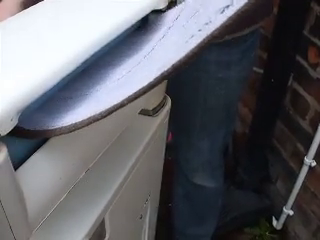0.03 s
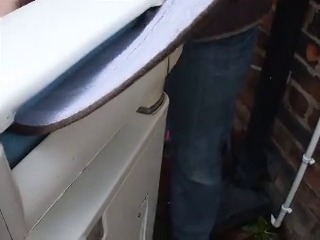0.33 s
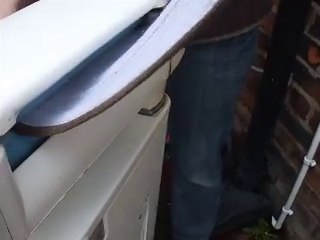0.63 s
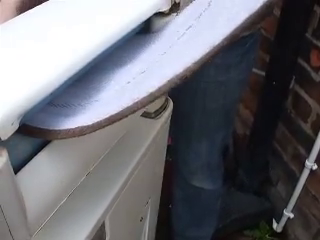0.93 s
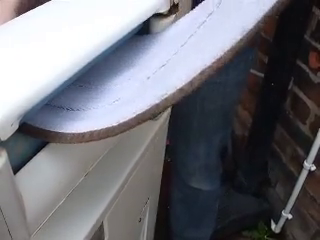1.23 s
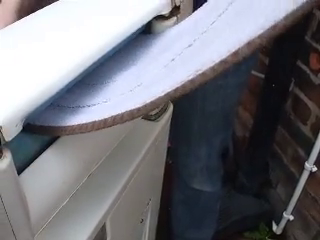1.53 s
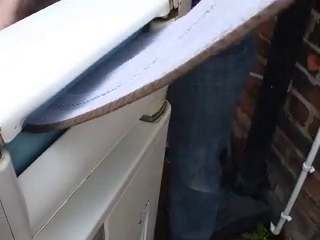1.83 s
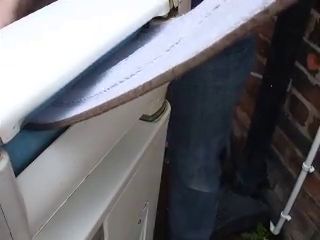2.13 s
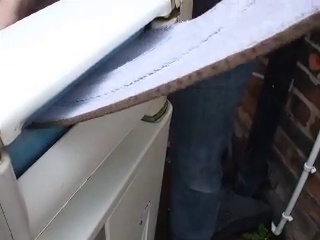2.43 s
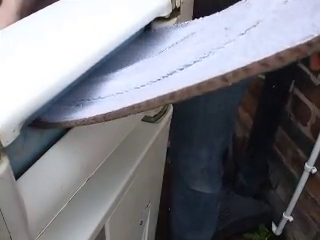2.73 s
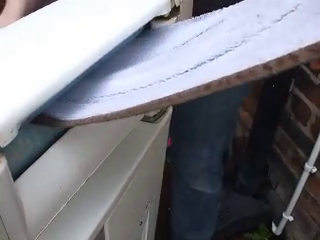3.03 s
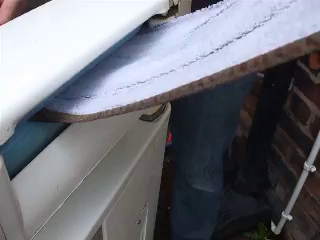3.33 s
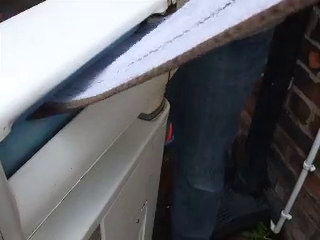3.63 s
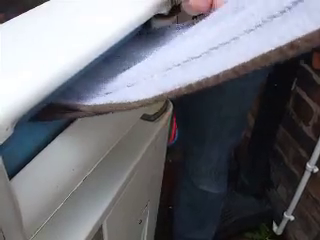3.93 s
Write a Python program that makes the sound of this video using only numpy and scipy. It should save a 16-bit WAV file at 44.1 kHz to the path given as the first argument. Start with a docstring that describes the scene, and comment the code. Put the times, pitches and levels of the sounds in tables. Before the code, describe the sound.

A washing machine wringer clunks sharply at about 0.7, 1.5, 2.4 and 3.3 seconds, each strike briefly ringing the metal frame and overloading the close microphone. A low motor hum runs throughout, with a few soft cabinet bumps. More quietly, water squelches and fizzes from a wet rug and gurgles into the tub, wettest near 3 seconds, then easing off while the motor hums on.

```python
"""A washing machine in a brick yard, one microphone close beside its wringer.
From the start the motor hums and the rollers draw a wet rug through: water squelches out and gurgles
into the tub. At 0.7 s, and again once a turn, the roller drive slips and clunks, ringing the steel
frame, shaking the cabinet and overloading the microphone. The wettest squeeze comes near 3 s,
just before the fourth clunk; then the water eases off and the motor hums on."""
import sys
import numpy as np
from scipy import signal
from scipy.fft import rfft, irfft, next_fast_len
from scipy.io import wavfile
from scipy.ndimage import map_coordinates

SR = 44100
rng = np.random.default_rng(int(sys.argv[2]) if len(sys.argv) > 2 else 0)


def to_wav(sig):
    """Store sig (one row per channel, or 1-D mono) as 16-bit WAV at the path in sys.argv[1].

    Samples outside -1..1 are clipped; the rate is SR.
    """
    pcm = np.clip(np.atleast_2d(sig), -1, 1) * 32767
    pcm = np.round(pcm).astype(np.int16)
    wavfile.write(sys.argv[1], SR, pcm.T)  # frames by channels


N = 176400

# slips of the drive, close to the microphone: t/s, level/dB, ring re that level/dB, cabinet thud/dB
DRIVE_SLIPS = [(0.6604, -1.7, -28, -30), (1.5374, -2, -27, -27), (2.4023, -1, -24, -30),
               (3.2773, -1.5, -28.5, -32)]
# colour of the strike: f/Hz, level/dB
STRIKE_COLOUR = [(100, -22), (450, -16), (800, -5), (1450, -3), (1750, -10), (2000, -2.5), (2400, 7.5),
                 (2700, -3), (3000, 0), (3400, -20.5), (3900, -6), (5500, -7)]
# modes of the wringer's steel frame: f/Hz, level/dB, t60/s
FRAME_MODES = [(727, -7, .22), (807, -8, .25), (1217, -6, .16), (1378, -9, .35), (1776, -16, .5),
               (2000, -1, .15), (2346, -10, .5), (2535, -8, .25), (2835, -6, .16), (3089, -3, .22),
               (4226, -12, .2), (4800, -11, .13), (5245, -14, .42), (5776, -16, .45)]
# colour of the loose parts: f/Hz, level/dB
RATTLE_COLOUR = [(150, -23.5), (500, 0), (900, 1.5), (1150, -1.5), (1700, -2.5), (2400, 1), (3200, -2.5),
                 (3800, -2), (4400, -7), (5600, -14.5)]
# colour of the cabinet: f/Hz, level/dB
CABINET_COLOUR = [(20, -2), (50, -4), (130, 0), (260, -3.5), (400, -12), (700, -19.5), (1500, -44.5),
                  (4000, -83.5)]


def drive_clunks():
    """A hard strike and its rebound ring the frame, rattle loose parts and thud the cabinet."""
    out, t = np.zeros(N), np.arange(SR * 3 // 4) / SR
    rebound_s, ring_rise_s, thud_rise_s = .0023, .00049, .021
    for s, db, ring_db, thud_db in DRIVE_SLIPS:
        strike = amp(db + 15) * click(STRIKE_COLOUR)
        ring = np.zeros(len(t))
        for hz, mode_db, t60 in FRAME_MODES:
            envelope = amp(mode_db + rng.normal(0, 1.2)) * fade(t, t60)
            ring += envelope * np.sin(2 * np.pi * (hz * t + rng.random()))
        rattle = noise(RATTLE_COLOUR, len(t)) * (fade(t, t60=.2) + amp(3) * fade(t, t60=.023))
        metal = (amp(ring_db) * ring + amp(-20.5) * rattle) * (1 - np.exp(-t / ring_rise_s))
        thud = noise(CABINET_COLOUR, len(t)) * (1 - np.exp(-t / thud_rise_s)) * fade(t, t60=.47)
        add(out, s, strike)
        add(out, s + rebound_s, amp(-11) * strike)
        add(out, s, amp(db) * metal + 2 * amp(thud_db) * thud)
    return out


# water pressed through the cloth at the rollers: t/s, relative level/dB
SQUEEZE_FLOW = [(0, -47.5), (.13, -41), (.41, -42), (.48, -52.5), (.58, -49), (.78, -45), (.98, -48),
                (1.1, -59.5), (1.26, -53), (1.42, -44.5), (1.62, -43.5), (1.85, -49), (2.0, -43.5),
                (2.25, -40.5), (2.38, -52), (2.55, -69), (2.6, -41), (2.96, -37.5), (3.2, -39.5),
                (3.38, -57), (4, -50)]
# colour of the fizz: f/Hz, level/dB
FIZZ_COLOUR = [(100, -42), (600, -18), (1200, -4), (2000, -3.5), (3000, 2.5), (4000, 2.5), (5500, -1.5)]
# larger bubbles bursting from the cloth: t/s, relative level/dB, f/Hz
CLOTH_BURSTS = [(.218, -24.5, 2230), (.300, -21.5, 5100), (.377, -29, 1630), (.412, -22, 4500),
                (.529, -21.5, 3170), (.547, -34, 2780), (.561, -26, 3600), (.607, -18, 4600),
                (.799, -26.5, 2840), (.845, -24.5, 3580), (.865, -24.5, 1950), (.867, -22.5, 3700),
                (.899, -27, 3080), (.963, -24.5, 4580), (.979, -21, 4350), (1.327, -31.5, 3260),
                (1.411, -29.5, 3000), (1.675, -16.5, 4380), (1.739, -30.5, 3700), (1.813, -21, 4520),
                (1.975, -21.5, 4070), (2.049, -27, 3600), (2.086, -20.5, 3480), (2.122, -22, 3930),
                (2.126, -25.5, 2140), (2.165, -23, 4300), (2.185, -27, 1520), (2.26, -24, 4300),
                (2.587, -25, 4450), (2.633, -24, 3640), (2.694, -12, 4000), (2.795, -22, 3500),
                (2.837, -22, 3400), (2.926, -21, 4800), (2.956, -16.5, 4840), (2.98, -24.5, 3260),
                (3.14, -28, 4240), (3.185, -27.5, 3400), (3.2525, -17, 4100), (3.712, -33.5, 3740),
                (3.738, -35, 3300)]


def rug_squelch():
    """Air and water leave the cloth as fizz, small bubbles and larger bursts."""
    fizz = amp(-4.5 + 2.5 * wobble(80)) * level(SQUEEZE_FLOW, clock()) * noise(FIZZ_COLOUR, N)
    tiny = stream(SQUEEZE_FLOW, centre_hz=4584, scatter=.22, spread_db=6, cycles=33, count=1900)
    medium = stream(SQUEEZE_FLOW, centre_hz=1910, scatter=.3, spread_db=3.5, cycles=25, count=700)
    large = bursts(CLOTH_BURSTS, spread_s=.011, scatter=.15, cycles=22, glide=.13,
                   fall_db=10.5, sink_octaves=.18, count=10)
    return fizz + amp(-3) * tiny + amp(-12) * medium + amp(.5) * large


# water running back into the tub: t/s, level/dB
RUNOFF_FLOW = [(0, -74), (.12, -47.5), (.33, -45), (.48, -52), (.8, -46.5), (1.05, -53.5), (2.55, -53.5),
               (2.66, -43.5), (2.74, -49.5), (2.88, -45), (3.18, -46.5), (3.4, -56), (4, -61.5)]
# drops landing in the tub: t/s, relative level/dB, f/Hz
TUB_DROPS = [(.094, -26, 625), (.111, -25, 730), (.136, -23, 650), (.275, -24, 615), (.375, -26, 670),
             (1.670, -23.5, 880), (1.739, -33, 720), (2.884, -23.5, 750), (3.695, -22.5, 814)]


def tub_runoff():
    """Water gurgles and plops into the tub as low, quickly damped bubbles."""
    gurgle = stream(RUNOFF_FLOW, centre_hz=791, scatter=.21, spread_db=2, cycles=7.8, count=1100)
    plops = bursts(TUB_DROPS, spread_s=.011, scatter=.17, cycles=13, glide=.12,
                   fall_db=9, sink_octaves=0, count=4)
    return gurgle + amp(1) * plops


# dull bumps of the cabinet: t/s, level/dB, Gaussian width/s
CABINET_BUMPS = [(0.74, -32.5, 0.051), (1.332, -43, .025), (1.528, -31, 0.02), (1.639, -22, 0.011),
                 (1.672, -23, 0.0062), (1.796, -32, .04), (2.117, -43.5, 0.035), (3.61, -25.5, 0.014),
                 (3.646, -28, 0.012), (3.713, -31, 0.026)]


def cabinet_bumps():
    """The cabinet booms softly as the rug drags on it."""
    swell = sum(amp(db) * np.exp(-.5 * ((clock() - s) / width) ** 2) for s, db, width in CABINET_BUMPS)
    return swell * noise(CABINET_COLOUR, N)


# hum of the motor iron: harmonic number, rms level/dB, waver/dB
IRON_HUM = [(1, -33.5, 0.7), (2, -30.5, .7), (3, -39, 1.5), (5, -56.5, 0.85), (6, -58, 1.7), (7, -53, 1.7)]
# tones of the turning parts: f/Hz, rms level/dB
TURNING_TONES = [(146, -53.5), (239, -54), (297.8, -49.5), (348, -53.5)]
# colour of the machine's rumble: f/Hz, level/dB
RUMBLE_COLOUR = [(20, -5), (40, -0.5), (90, 0), (170, -5), (330, -5), (450, -10.5), (900, -39),
                 (3000, -82.5)]
# colour of its running noise: f/Hz, level/dB
RUNNING_COLOUR = [(200, -7.5), (400, -4), (680, -1.5), (1000, -5), (1400, -10), (2500, -16), (4000, -18),
                  (5600, -22)]


def motor(hum_hz=100):
    """Behind the wringer's sounds, mains hum beats with the turning parts over running noise."""
    t, tones = clock(), np.zeros(N)
    for k, db, waver_db in IRON_HUM:
        gain = amp(db + waver_db * wobble(7))
        tones += gain * np.cos(2 * np.pi * k * hum_hz * t + .018 * k * wobble(5))
    for hz, db in TURNING_TONES:
        tones += amp(db + 1.8 * wobble(7.7)) * np.sin(2 * np.pi * hz * t + 1.4 * wobble(4))
    rumble = amp(-41.5 + .86 * wobble(9.8)) * noise(RUMBLE_COLOUR, N)
    running = amp(-45 + 1.1 * wobble(13)) * noise(RUNNING_COLOUR, N)
    return np.sqrt(2) * tones + rumble + running


# decay between the brick walls around the machine: f/Hz, t60/s
WALL_DECAY = [(100, 0.6), (1000, 0.14), (3000, 0.12), (6000, 0.072)]


def yard_echo(x):
    """A short answer from the walls, the treble dying first."""
    hz, t, spectra = signal.stft(rng.standard_normal(SR // 3), SR, nperseg=256)
    _, tail = signal.istft(spectra * fade(t, along(WALL_DECAY, hz)[:, None]), SR, nperseg=256)
    return signal.fftconvolve(x, tail / np.linalg.norm(tail))[:N]


def bursts(rows, spread_s, scatter, cycles, glide, fall_db, sink_octaves, count):
    """Each (t/s, level/dB, f/Hz) row is a quick cluster of bubbles that weaken and may sink in pitch."""
    s, db, hz = np.repeat(np.array(rows), count, axis=0).T
    progress = np.tile(np.arange(count), len(rows)) / count
    time_jitter, pitch_jitter = rng.standard_normal((len(s), 2)).T
    times = s + spread_s * progress ** 1.5 * np.exp(.3 * time_jitter)
    pitch = hz * np.exp(scatter * pitch_jitter) * 2 ** (sink_octaves * (.5 - progress))
    return bubbles(times, amp(db - fall_db * progress), pitch, cycles, glide)


def stream(curve, centre_hz, scatter, spread_db, cycles, count):
    """Bubbles of random strength and pitch under a level curve."""
    pitch = centre_hz * np.exp(scatter * rng.standard_normal(count))
    gains = amp(spread_db * np.minimum(rng.exponential(size=count), 3))
    times = rng.uniform(0, N / SR, count)
    return unit(bubbles(times, gains, pitch, cycles, glide=.22)) * level(curve, clock())


def bubbles(times, gains, pitch, cycles, glide, size=2048):
    """Each bubble rings as a damped sine with a soft start, gliding a little as it dies."""
    t = np.arange(size) / SR
    age = np.minimum(t * pitch[:, None] / cycles, 2)  # 60 dB down at age 1
    bend = glide * rng.normal(.5, 1, (len(times), 1))
    envelope = gains[:, None] * fade(age, 1) * (1 - np.exp(-20 * age))
    waves = envelope * np.sin(2 * np.pi * cycles * age * (1 + bend * age))
    index = np.abs(times * SR).astype(int)[:, None] + np.arange(size)
    return np.bincount(index.ravel(), waves.ravel(), N)[:N]


def click(colour, size=1024):
    """A minimum-phase impulse of energy 1 with the given colour."""
    gains = amp(along(colour, np.fft.rfftfreq(size, 1 / SR)))
    cepstrum = irfft(np.log(gains))
    causal_fold = np.r_[1, np.full(size // 2 - 1, 2), np.zeros(size // 2)]
    pulse = irfft(np.exp(rfft(cepstrum * causal_fold)))
    return pulse / np.linalg.norm(pulse)


def noise(colour, size):
    """Coloured noise of rms 1."""
    return unit(filtered(rng.standard_normal(size), lambda hz: amp(along(colour, hz))))


def filtered(x, response):
    """Pass x through a gain that depends on frequency."""
    size = next_fast_len(len(x) + 8192)
    return irfft(rfft(x, size) * response(np.fft.rfftfreq(size, 1 / SR)), size)[:len(x)]


def wobble(rate):
    """A smooth random curve, rate knots a second."""
    knots = rng.standard_normal(int(N * rate / SR) + 4)
    return map_coordinates(knots, [clock() * rate])


def along(points, hz):
    """Read (f/Hz, value) points on a log frequency axis."""
    f, values = np.transpose(points)
    return np.interp(np.log(hz + 1), np.log(f + 1), values)


def level(curve, t):
    """Gain of a (t/s, level/dB) curve at times t."""
    return amp(np.interp(t, *np.transpose(curve)))


def fade(t, t60):
    """Exponential decay, 60 dB down at t60."""
    return np.exp(-np.log(1000) * t / t60)


def amp(db):
    """Decibels to gain."""
    return 10 ** (np.asarray(db) / 20)


def unit(x):
    """Scale to rms 1."""
    return x / np.sqrt(np.mean(x ** 2) + 1e-20)


def clock():
    """Time of every sample."""
    return np.arange(N) / SR


def add(track, s, sound):
    """Mix a sound into the track at s seconds."""
    part = track[max(0, round(s * SR)):][:len(sound)]
    part += sound[:len(part)]


def scene():
    """Machine and water in mono from just beside the wringer; the walls answer the water."""
    water = rug_squelch() + tub_runoff()
    machine = motor() + drive_clunks() + cabinet_bumps()
    return (machine + water + amp(-5.5) * yard_echo(water))[None]


def record(dry):
    """The close microphone's narrow-band path clips, adding a brief spit of treble to each clunk."""
    band_hz, overload, top_hz = 5680, .72, 16000
    narrow = filtered(dry[0], lambda hz: 1 / np.sqrt(1 + (hz / band_hz) ** 90))
    clipped = np.clip(narrow, -overload, overload)
    return filtered(clipped, lambda hz: 1 / np.sqrt(1 + (hz / top_hz) ** 80))[None]


dry = scene()
out = record(dry)
to_wav(out)
```